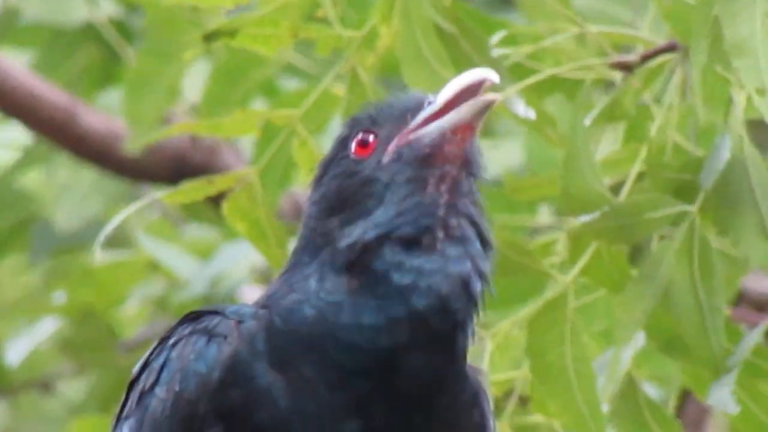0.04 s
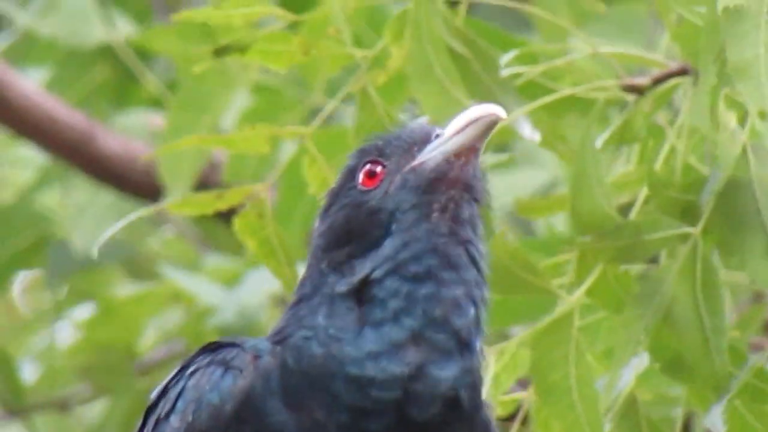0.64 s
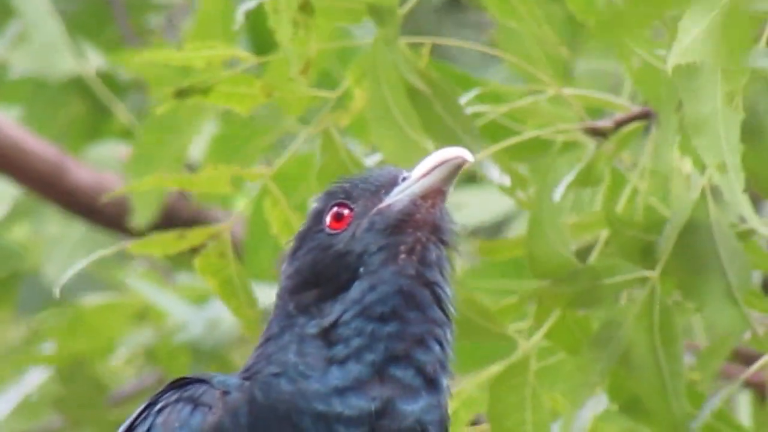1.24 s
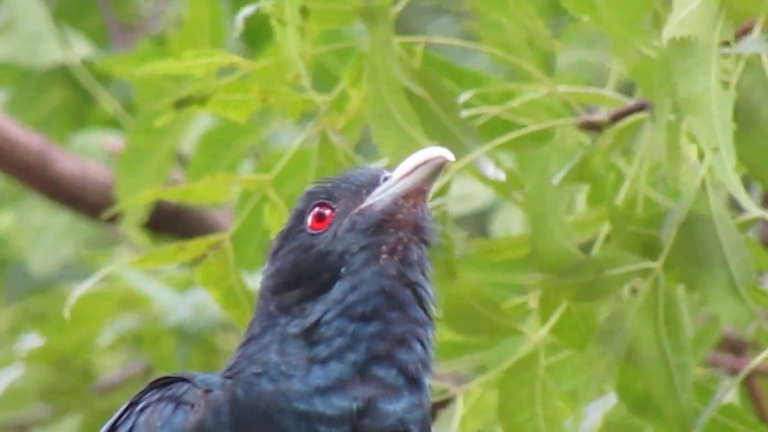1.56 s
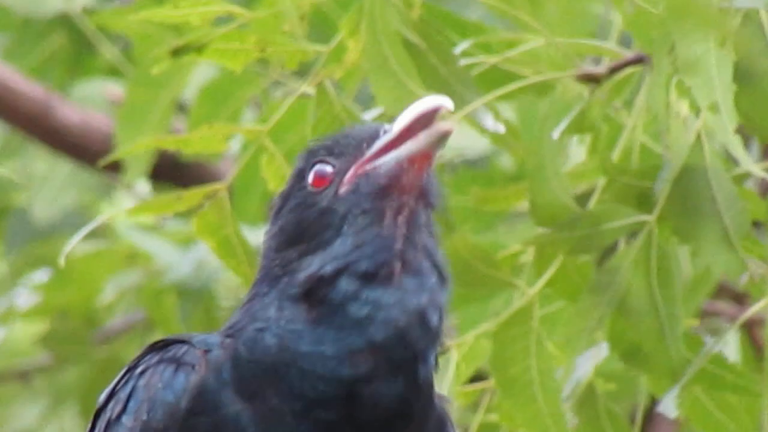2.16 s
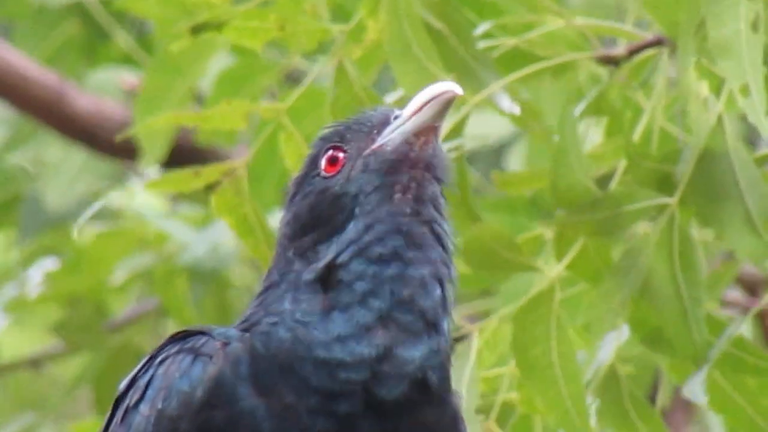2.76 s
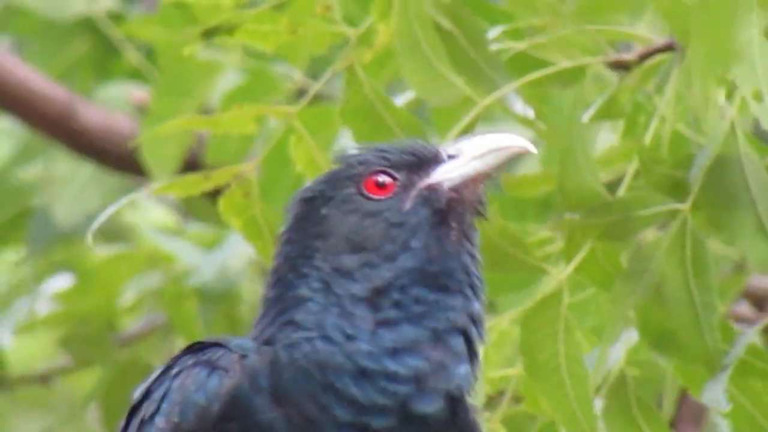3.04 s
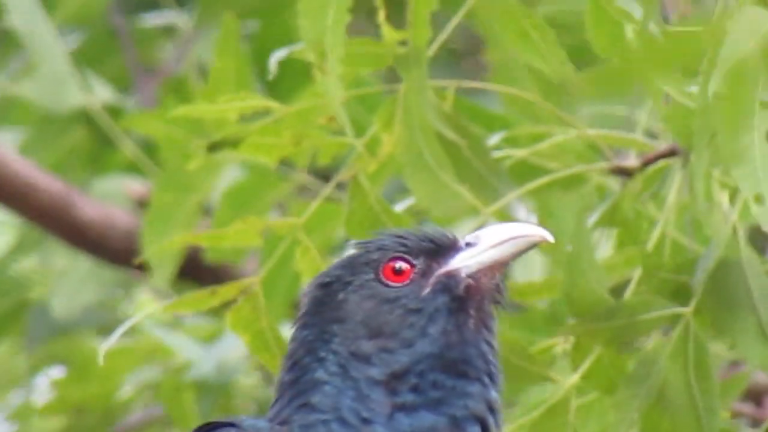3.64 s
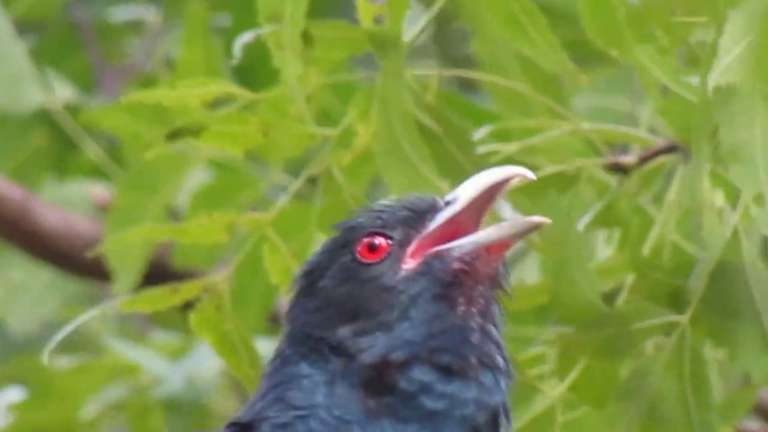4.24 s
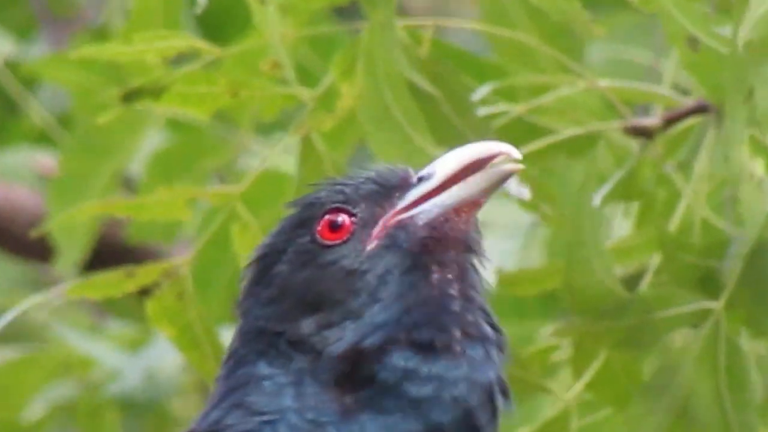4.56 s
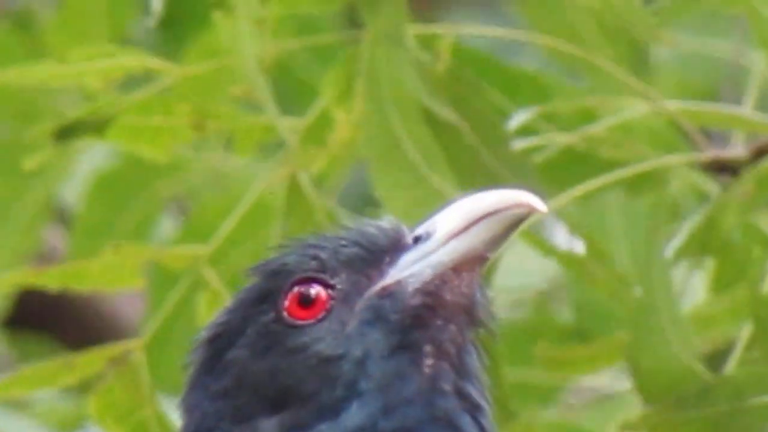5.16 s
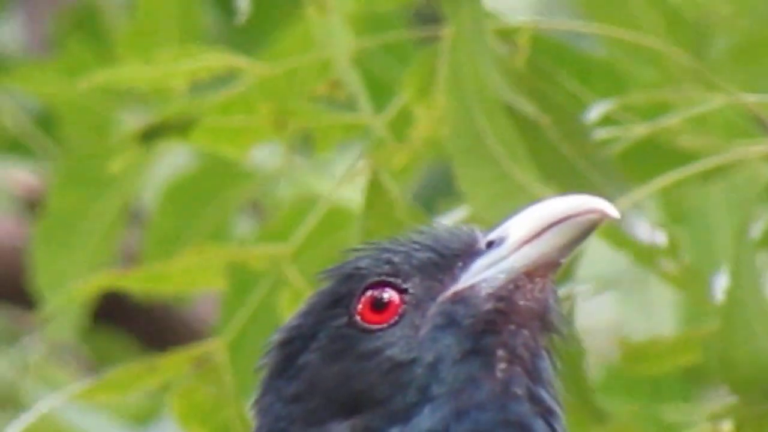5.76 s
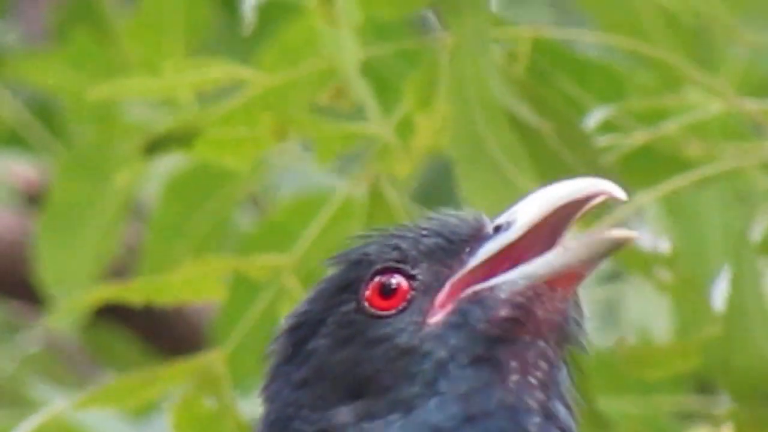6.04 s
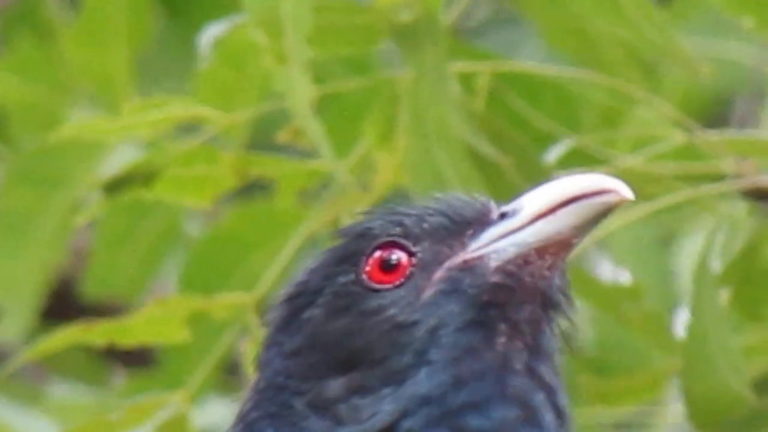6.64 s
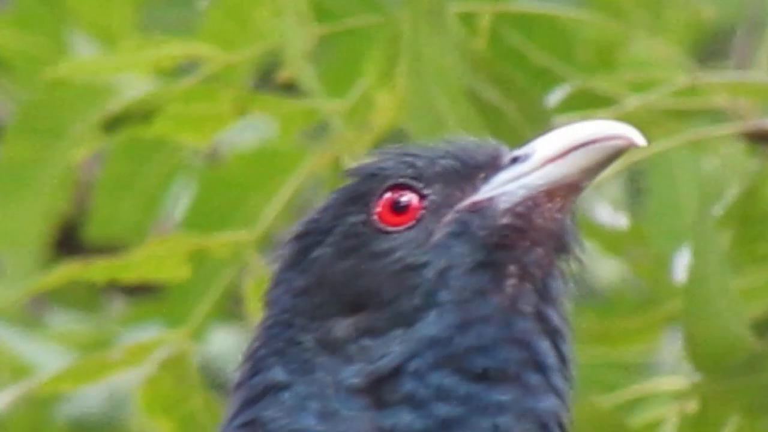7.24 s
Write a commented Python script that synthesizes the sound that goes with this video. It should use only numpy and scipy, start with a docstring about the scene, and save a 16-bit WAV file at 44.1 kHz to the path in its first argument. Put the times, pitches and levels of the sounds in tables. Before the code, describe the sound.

A koel calls close by from a leafy tree over a quiet, steady outdoor wash. Its first call comes right at the start: a loud, clear whistle about half a second long that swells, arches upward and falls away, with a slight throb, a faint raspy edge and a short echo. A puff of wind bumps the microphone with low thuds between 0.6 and 1 second. The bird calls again at about 2.2, 4.1 and 6.1 seconds, each time a little higher. Small birds chirp faintly far off, around 1.5 seconds and again near the end. At about 3.7 seconds a faint low drone swells and slowly fades, and a soft hiss creeps in and lingers. Tiny dry ticks sound near 3.8 and 4.9 seconds. The drone returns faintly around 7 seconds, just after the last call.

```python
"""Over a quiet outdoor wash, a koel calls from a leafy tree: its syrinx gives a loud whistle that swells,
arches and falls away, throbbing as it interferes with echoes off the ground and nearby surfaces.
Small birds chirp far off, and a puff of wind bumps the microphone. The koel calls three more times,
each higher than the last. About halfway a faint drone swells, the first of a few dry ticks sounds
and a hiss creeps in; the drone returns at the end."""
import sys
import numpy as np
from scipy import signal
from scipy.fft import rfft, irfft, next_fast_len
from scipy.io import wavfile
from scipy.ndimage import uniform_filter1d

SR = 44100
rng = np.random.default_rng(int(sys.argv[2]) if len(sys.argv) > 2 else 0)


def wav_record(signal):
    """Record a signal, one row per channel, as 16-bit PCM in the file named by sys.argv[1]."""
    frames = np.transpose(np.atleast_2d(signal))
    bounded = np.clip(frames, -1, 1)
    # unit amplitude maps onto the largest positive 16-bit level
    quanta = np.round(bounded * 32767).astype(np.int16)
    wavfile.write(sys.argv[1], SR, quanta)


N = 322371


def gain_of(db):
    """The decibel scale: amplitude grows tenfold every 20 dB."""
    return 10 ** (np.asarray(db) / 20)


def unit_rms(x):
    """Normalisation to unit mean power."""
    return x / np.sqrt(np.mean(x ** 2) + 1e-20)


def curve_at(points, hz):
    """Interpolation on a logarithmic frequency axis."""
    f, value = np.transpose(points)
    return np.interp(np.log(hz + 1), np.log(f + 1), value)


def add(mix, start_s, sound):
    """Superposition: a sound sums into the mix from its start time."""
    part = mix[round(start_s * SR):][:len(sound)]
    part += sound[:len(part)]


def noise(spectrum, patchy_db):
    """Spectral shaping: noise of rms 1 whose level drifts in patches of time and frequency."""
    hz = np.fft.rfftfreq(2048, 1 / SR)
    real, imag, patches = rng.standard_normal((3, N // 512 + 5, len(hz)))
    patches = uniform_filter1d(patches, size=8, axis=0)
    patches = unit_rms(uniform_filter1d(patches, size=20, axis=1))
    frames = (real + 1j * imag) * gain_of(curve_at(spectrum, hz) + patchy_db * patches)
    return unit_rms(signal.istft(frames.T, nperseg=2048, noverlap=1536)[1][:N])


def wobble(count, rate_hz):
    """Random modulation: low-passed noise of rms 1."""
    size = next_fast_len(count)
    lowpass = np.exp(-(np.fft.rfftfreq(size, 1 / SR) / rate_hz) ** 2)
    return unit_rms(irfft(rfft(rng.standard_normal(size)) * lowpass, size)[:count])


def swells(rows):
    """Envelopes that grow exponentially, hold, and decay exponentially."""
    t = np.arange(N) / SR
    return sum(gain_of(db - rise * np.maximum(start - t, 0) - fall * np.maximum(t - end, 0))
               for start, end, db, rise, fall in rows)


def bursts(rows):
    """Resonance: each short puff of noise is confined to one band."""
    out, hz = np.zeros(N), np.fft.rfftfreq(8192, 1 / SR)
    for start, length, centre, width, db in rows:
        resonance = 1 / (1 + ((hz - centre) / width) ** 2) ** 2
        puff = irfft(rfft(rng.standard_normal(8192)) * resonance)[:round(length * SR)]
        add(out, start, gain_of(db) * unit_rms(puff * signal.windows.tukey(len(puff), 0.5)))
    return out


def outdoor_wash(level_db=-41):
    """Ambient noise: a steady broadband floor, strongest in the bass."""
    # spectrum of the wash: (frequency [Hz], relative density [dB])
    spectrum = [(15, -40), (25, -18), (38, 7), (50, -8), (93, -1), (250, -6), (427, -7.5), (769, -9.5),
                (1030, -10), (2370, -20), (3350, -24), (10000, -34.5), (15000, -45)]
    return gain_of(level_db) * noise(spectrum, patchy_db=0.83)


def call_pitch(t, rise_s, start_hz, top_hz, climb, scoop_hz=48.6, scoop_s=0.022, arch_s=0.089,
               bend_s=0.1455, sag_per_s=20.5):
    """Frequency glide: a scoop, a steady climb, an arch, and a fall that is faster after a wider rise."""
    span = top_hz - start_hz
    before, after = np.maximum(rise_s - t, 0), np.maximum(t - rise_s, 0)
    scoop = scoop_hz * np.exp(-t / scoop_s)
    arch = (span - climb * rise_s) * np.exp(-(before / arch_s) ** 2)
    fall = sag_per_s * span * (np.hypot(after, bend_s) - bend_s)
    return start_hz - scoop + climb * t + arch - fall


def effort_db(hz, knee_hz, soft_hz, db_per_hz):
    """Coupling of level to pitch: full above a soft knee, ever weaker below it."""
    return -db_per_hz * soft_hz * np.logaddexp(0, (knee_hz - hz) / soft_hz)


def overtones(hz, phase, force_db, shut, roughness=0.084, flicker_db=1.73):
    """Source and filter: force strengthens the harmonics of the syrinx; throat and beak colour them."""
    # harmonics of the syrinx: (harmonic number, level at 0 dB force [dB], growth with force [dB/dB])
    harmonics = [(2, -45.5, 0.43), (3, -39.5, 2.36), (4, -46.5, 1.4), (5, -41, 1), (6, -42.5, 1.5),
                 (7, -42.5, 1), (8, -58, 3), (9, -51.5, 1.5), (10, -56, 1), (11, -55, 1), (12, -58, 0.5)]
    # throat and open beak, with two deep antiresonances: (frequency [Hz], gain [dB])
    open_beak = [(2150, 3), (2550, 0), (2950, 3.5), (3650, -2), (4300, -8), (4850, -8.5), (5400, 3.5),
                 (6700, -0.5), (7500, 5.5), (8600, -0.5), (9300, -14), (10100, -4), (11100, -1), (12000, 4),
                 (15000, -7.5)]
    # extra colour of the nearly shut beak: (frequency [Hz], gain [dB])
    shut_beak = [(2000, 8), (2500, 8), (3500, -2), (6000, -26)]
    # pushed hard, the membranes close a little early or late, which frays the high overtones most
    closing = phase + roughness * gain_of(0.3 * force_db) * wobble(len(hz), rate_hz=260)
    buzz = np.zeros(len(hz))
    for k, db, growth in harmonics:
        colour = curve_at(open_beak, k * hz) + shut * curve_at(shut_beak, k * hz)
        flicker = flicker_db * wobble(len(hz), rate_hz=35)
        buzz += gain_of(db + growth * force_db + colour + flicker) * np.cos(k * closing)
    return buzz


def koel_call(rise_s, start_hz, top_hz, climb, whistle_db, force_db, catch_s,
              fall_s=0.24, edge_s=0.019, open_s=0.048, close_s=0.073, jitter=0.00067, fade_db=-2.0):
    """Voiced oscillation: the throat favours the fundamental whistle; force adds a bright, rough buzz."""
    t = np.arange(0, rise_s + fall_s, 1 / SR)
    hz = call_pitch(t, rise_s, start_hz, top_hz, climb)
    phase = 2 * np.pi * np.cumsum(hz * (1 + jitter * wobble(len(t), rate_hz=130))) / SR
    gate = np.clip(np.minimum(t, t[-1] - t) / edge_s, 0, 1)
    # the voice catches at first: the force rises while the whistle is held back
    catching = np.exp(-(t / catch_s) ** 4)
    force = force_db + effort_db(hz, knee_hz=1396, soft_hz=70, db_per_hz=0.048) + 1.5 * catching
    level = whistle_db + effort_db(hz, knee_hz=1256, soft_hz=69, db_per_hz=0.075) - 7 * catching
    whistle = gain_of(level) * np.cos(phase)
    # the beak opens just after the voice starts and closes during the fall, while the buzz fades
    shut = np.exp(-(t / open_s) ** 2) + np.exp(-((t[-1] - t) / close_s) ** 4)
    fade = gain_of(fade_db * np.maximum(t - rise_s, 0) / fall_s)
    return gate * whistle, gate * fade * overtones(hz, phase, force, shut)


def koel(rasp_hz=1440, rasp_width_hz=400, rasp_share=0.68):
    """Tonal and noisy voicing: four calls, with a puff of rasp escaping each time the voice catches."""
    # the calls: (start [s], top [s], start pitch [Hz], top pitch [Hz], climb [Hz/s],
    # whistle level [dB], force [dB], catch length [s], rasp level [dB])
    calls = [(.09, 0.4107, 1035, 1395, 831, -18, 1, 0.032, -47),
             (2.228, 2.5681, 1076, 1428, 692, -17.5, 1.5, 0.09, -49.5),
             (4.139, 4.4734, 1175, 1474, 540.6, -17.5, 1, 0.044, -39.5),
             (6.14, 6.4593, 1205, 1507, 545, -17, 1.5, 0.043, -45)]
    # stray rasps: (time [s], length [s], centre [Hz], width [Hz], level [dB])
    stray_rasps = [(.09, 0.075, 1350, 37, -42), (.085, 0.076, 2600, 540, -51),
                   (2.56, 0.18, 1770, 170, -50.5), (7.2, .22, 1770, 140, -51)]
    whistle, buzz, catches = np.zeros(N), np.zeros(N), []
    for start, top, *voice, catch_s, rasp_db in calls:
        call_whistle, call_buzz = koel_call(top - start, *voice, catch_s)
        add(whistle, start, call_whistle)
        add(buzz, start, call_buzz)
        catches.append((start, rasp_share * catch_s, rasp_hz, rasp_width_hz, rasp_db))
    return whistle, buzz, bursts(catches) + bursts(stray_rasps)


def echoes(x):
    """Interference: early reflections reinforce and cancel a gliding tone in turn."""
    # reflections, the ground first: (delay [ms], signed gain [ratio])
    paths = [(5.977, 0.758), (8.05, 0.16), (12.922, 0.15), (19.107, -0.225), (25.458, 0.072),
             (26.687, 0.087), (39.33, 0.091), (43.124, 0.108), (60.659, 0.085), (68.328, -0.067),
             (83.421, -0.161)]
    size = next_fast_len(N + SR // 4)
    hz = np.fft.rfftfreq(size, 1 / SR)
    response = sum(gain * np.exp(-2j * np.pi * hz * ms / 1000) for ms, gain in paths)
    return irfft(rfft(x, size) * response, size)[:N]


def leaves(x, decay_s=0.049, level_db=-2.0, cutoff_hz=6000):
    """Scattering: the small leaves around the perch return only short wavelengths, and briefly."""
    t = np.arange(SR // 5) / SR
    scatter = rng.standard_normal(len(t)) * np.exp(-t / decay_s)
    treble = signal.sosfilt(signal.butter(2, cutoff_hz, "high", fs=SR, output="sos"), x)
    return gain_of(level_db) * signal.fftconvolve(treble, scatter / np.linalg.norm(scatter))[:N]


def trees(x, build_s=0.16):
    """Reverberation: leaves and trunks scatter a tail that builds up, then dies soonest in the treble."""
    # colour of the diffuse tail: (frequency [Hz], gain [dB])
    colour = [(800, -23), (1150, -22), (1450, -17), (3000, -13), (7000, -7), (14000, -7)]
    # reverberation times: (frequency [Hz], time to fall 60 dB [s])
    decay_times = [(1000, 0.89), (1500, 1), (3000, 0.33), (7000, 0.39), (14000, 0.29)]
    hz, t, frames = signal.stft(rng.standard_normal(SR), SR, nperseg=256)
    t60 = curve_at(decay_times, hz)[:, None]
    envelope = gain_of(-60 * t / t60) * (1 - np.exp(-t / build_s))
    band_energy = SR * np.mean(envelope ** 2, axis=1, keepdims=True)
    envelope *= gain_of(curve_at(colour, hz))[:, None] / np.sqrt(band_energy)
    tail = signal.istft(frames * envelope, SR, nperseg=256)[1]
    return signal.fftconvolve(x, tail)[:N]


def small_birds(waver=0.023, waver_hz=200):
    """Frequency modulation: each distant chirp is a thin glide that wavers at random."""
    # chirps: (time [s], length [s], start pitch [Hz], end pitch [Hz], source level [dB])
    chirps = [(.1, .11, 2920, 2750, -59), (.94, .03, 3330, 2590, -59), (1.474, .025, 3220, 2480, -52),
              (1.549, 0.12, 3040, 3170, -52), (3.995, 0.056, 5940, 6100, -60),
              (5.928, 0.065, 3150, 2990, -57), (6.706, .1, 4230, 5200, -58.5),
              (6.787, 0.027, 5600, 6200, -60), (7.026, 0.12, 4120, 5100, -57),
              (7.122, 0.038, 5600, 6050, -55)]
    out = np.zeros(N)
    for start, length, start_hz, end_hz, db in chirps:
        count = round(length * SR)
        hz = np.linspace(start_hz, end_hz, count) * (1 + waver * wobble(count, waver_hz))
        chirp = signal.windows.tukey(count, 0.5) * np.sin(2 * np.pi * np.cumsum(hz) / SR)
        add(out, start, gain_of(db) * unit_rms(chirp))
    return out


def wind(bump_cycles=0.54):
    """Turbulence: a lumpy puff whose hardest eddies each push and pull the diaphragm once."""
    # wind on the microphone: (frequency [Hz], relative density [dB])
    spectrum = [(20, -18), (50, 3), (85, 0.5), (150, -3), (230, -15.5), (400, -25), (900, -65)]
    # a breeze and its gust: (full from [s], until [s], level [dB], rise [dB/s], fall [dB/s])
    gusts = [(.45, 1.0, -44, 50, 45), (.65, 0.81, -32, 500, 110)]
    # the hardest eddies: (time [s], frequency [Hz], envelope peak [dB])
    eddies = [(0.584, 84, -29), (0.66, 80, -23), (.838, 105, -23), (0.8594, 134, -17.5)]
    out = swells(gusts) * noise(spectrum, patchy_db=4.0)
    t = np.arange(-SR // 20, SR // 20) / SR
    for centre_s, hz, db in eddies:
        bump = -np.sin(2 * np.pi * hz * t) * np.exp(-(hz * t / bump_cycles) ** 2)
        add(out, centre_s + t[0], gain_of(db) * bump)
    return out


def far_drone():
    """Narrow-band noise: one spectral peak gives a faint pitch that comes and goes twice."""
    # spectrum of the drone: (frequency [Hz], relative density [dB])
    spectrum = [(20, -58), (170, -34), (205, -18), (214, 0), (226, -7), (270, -5), (800, -70)]
    # its swells: (full from [s], until [s], level [dB], rise [dB/s], fall [dB/s])
    envelope = [(3.65, 3.8, -50, 36, 5.5), (7.0, 7.3, -54, 11, 10)]
    return swells(envelope) * noise(spectrum, patchy_db=1.5)


def ticks():
    """Transients: noise only milliseconds long is heard as a small dry tick."""
    # ticks: (time [s], length [s], centre [Hz], width [Hz], level [dB])
    transients = [(3.784, 0.0092, 10700, 1300, -43.5), (4.928, 0.0018, 5600, 900, -38),
                  (4.9275, 0.0055, 9400, 3900, -45), (4.9295, 0.0066, 1900, 870, -37.5)]
    return bursts(transients)


def faint_hiss():
    """Broadband noise, weighted to the treble, that creeps in and lingers."""
    # spectrum of the hiss: (frequency [Hz], relative density [dB])
    spectrum = [(1000, -10), (2500, 0.5), (4500, -2), (7000, -2), (10000, -9), (12500, -14.5), (15000, -46)]
    # its swell: (full from [s], until [s], level [dB], rise [dB/s], fall [dB/s])
    envelope = [(3.95, 6.8, -53.5, 8, 5)]
    return swells(envelope) * noise(spectrum, patchy_db=2.0)


def scene(buzz_echo=0.45, far_direct=0.95, far_wet=2.8):
    """Direct and reflected sound superpose; the far birds are more reverberant than the near koel."""
    whistle, buzz, rasp = koel()
    near, far = whistle + buzz + rasp, small_birds()
    # the beak beams the overtones forward, so less of them reaches the ground
    reflected = echoes(whistle + buzz_echo * buzz) + leaves(buzz) + trees(near + far_wet * far)
    background = outdoor_wash() + far_drone() + faint_hiss()
    return (near + far_direct * far + reflected + background + wind() + ticks())[None]


def record(dry, low_cut_hz=28.4, notch_hz=7900, notch_width_hz=260, band_limit_hz=15050):
    """Filtering: the microphone chain cuts deep rumble, notches the treble and ends in a steep limit."""
    rumble_cut = signal.sosfilt(signal.butter(4, low_cut_hz, "high", fs=SR, output="sos"), dry)
    notched = signal.lfilter(*signal.iirnotch(notch_hz, notch_hz / notch_width_hz, SR), rumble_cut)
    lowpass = signal.firwin(511, band_limit_hz, window=("kaiser", 9), fs=SR)
    return signal.oaconvolve(notched, lowpass[None], "same")


dry = scene()
out = record(dry)
wav_record(out)
```